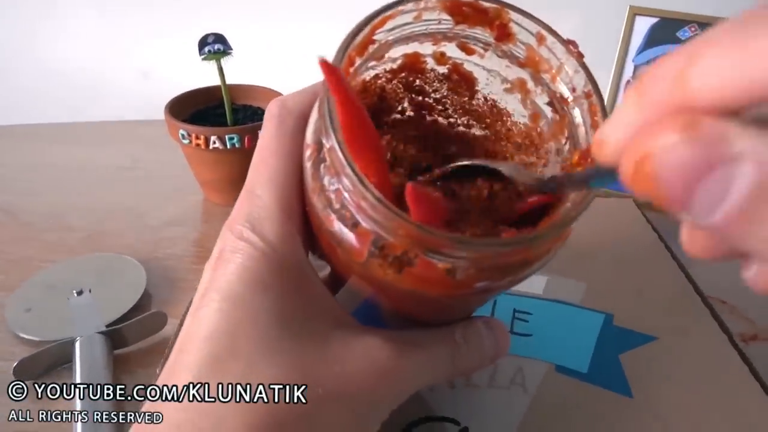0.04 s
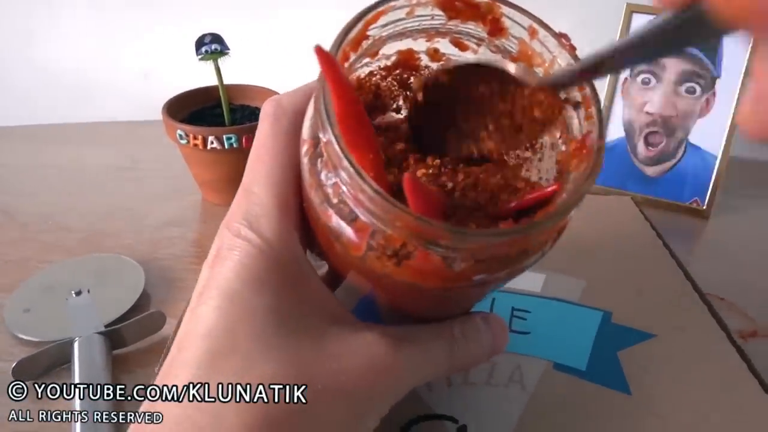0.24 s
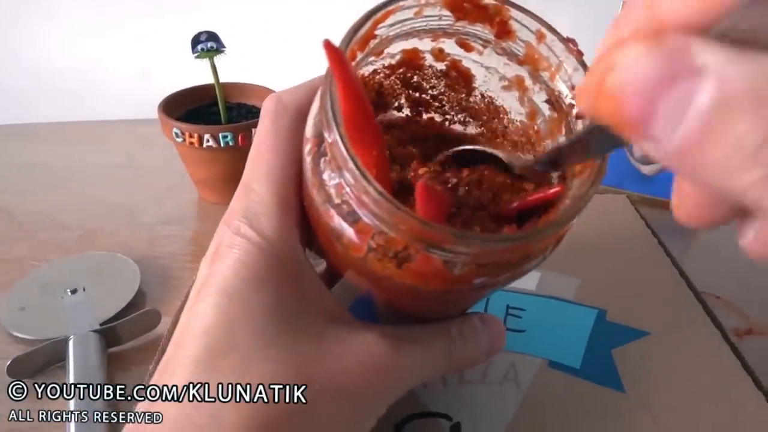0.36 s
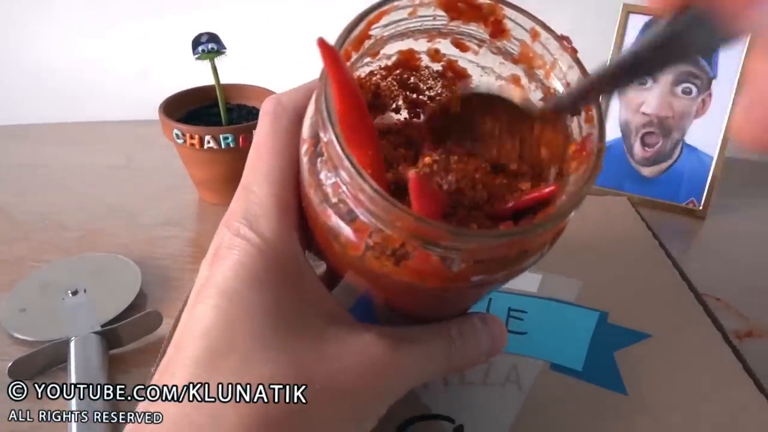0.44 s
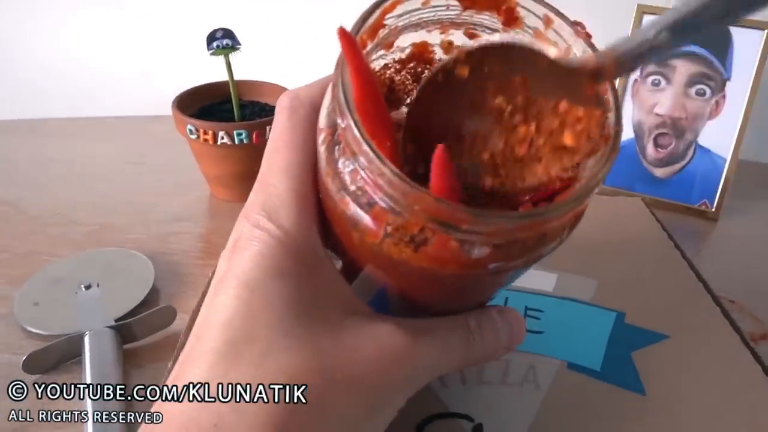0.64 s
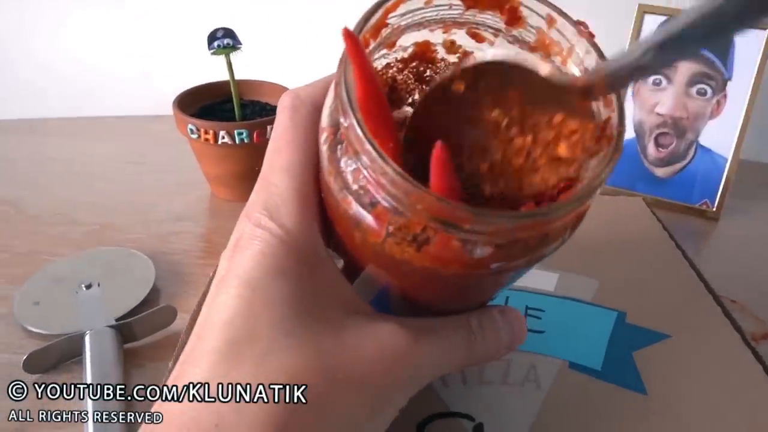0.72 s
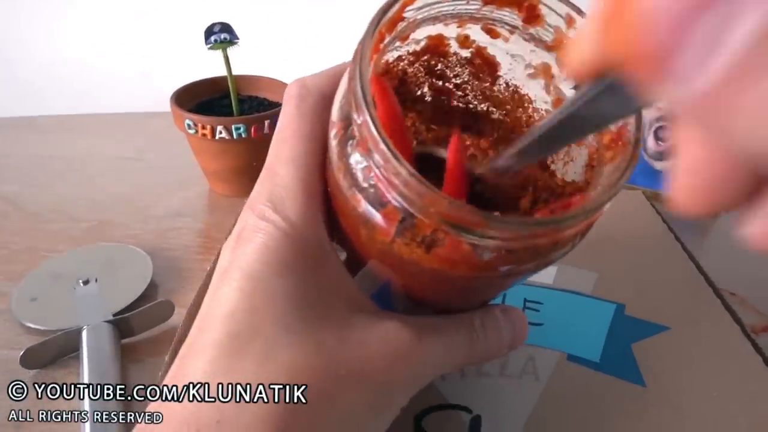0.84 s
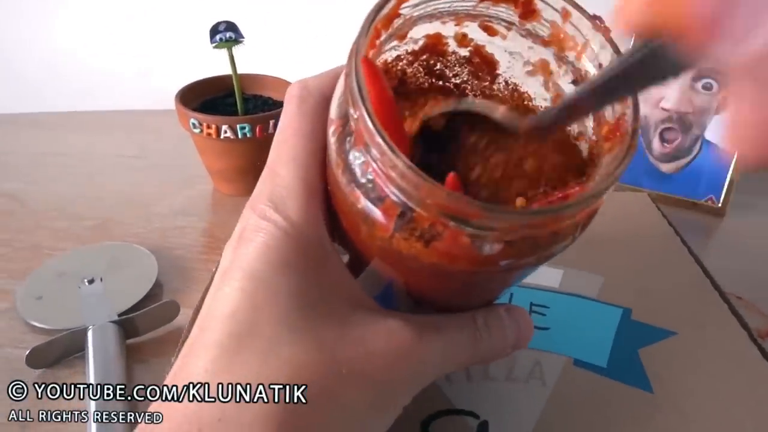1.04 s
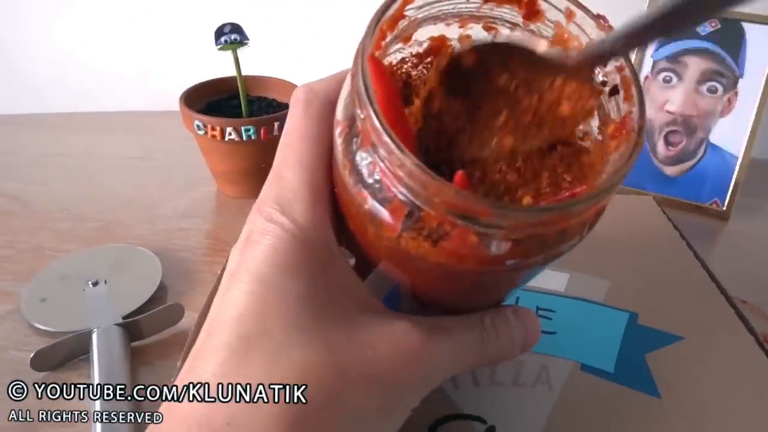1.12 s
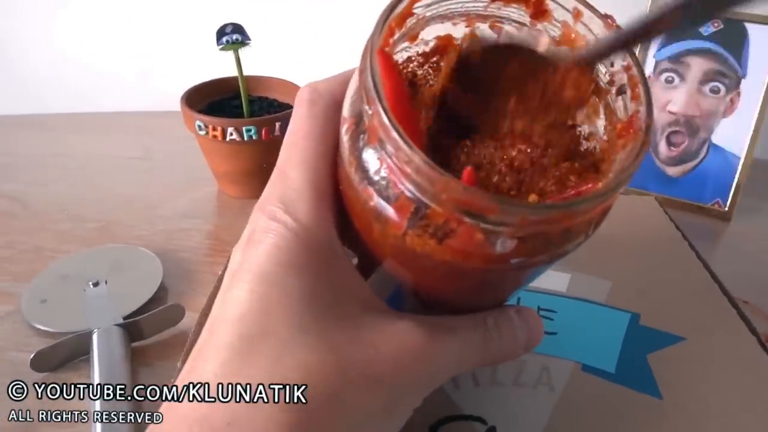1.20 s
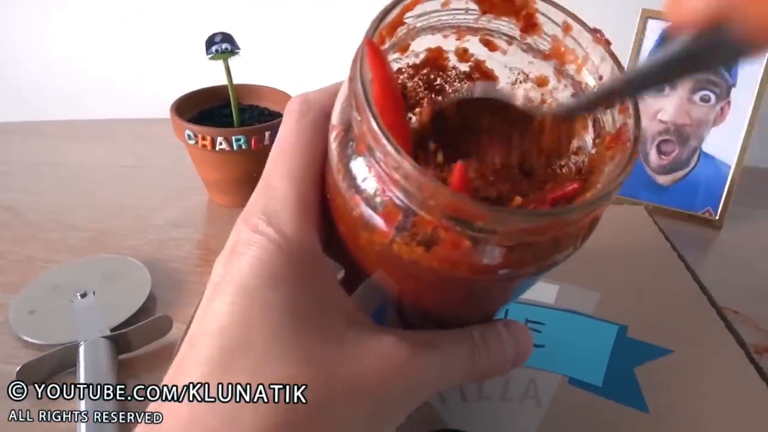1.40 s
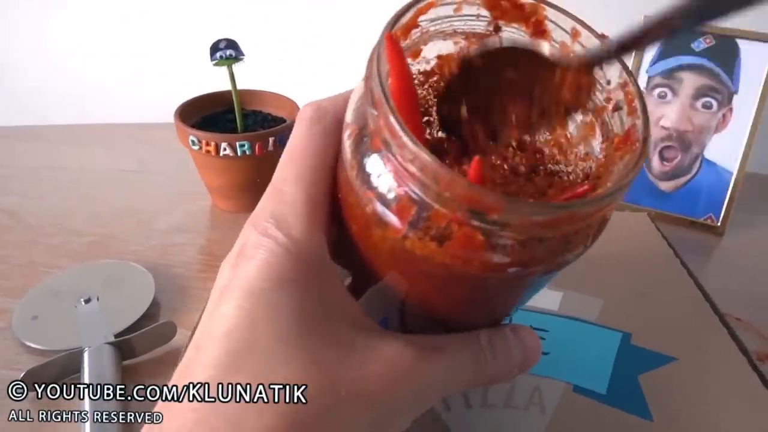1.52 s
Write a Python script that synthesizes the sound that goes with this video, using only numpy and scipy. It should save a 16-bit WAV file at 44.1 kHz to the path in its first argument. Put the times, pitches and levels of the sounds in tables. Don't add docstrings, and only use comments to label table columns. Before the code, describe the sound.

A metal spoon scrapes up the inside of a hand-held glass jar, clinks three times, the last hardest, then rubs down the wall with small sticky ticks, close-miked in a quiet room with a low appliance hum.

```python
import sys
import numpy as np
from scipy import signal
from scipy.fft import rfft, irfft
from scipy.io import wavfile
from scipy.ndimage import uniform_filter1d

SR = 44100
rng = np.random.default_rng(int(sys.argv[2]) if len(sys.argv) > 2 else 0)


def volts_from_decibels(level):
    exponent = np.asarray(level, float) / 20
    return 10 ** exponent


def transcribe(u):
    v = np.clip(np.atleast_2d(u).T, -1, 1)
    q = np.round(v * 32767).astype(np.int16)
    wavfile.write(sys.argv[1], SR, q)


N = 68355

# frequency in Hz, density in dB per Hz.
AIR_SPECTRUM = [(12, -56), (20, -25), (87, -10), (164, -8.5), (215, -11.5), (282, -10), (1410, -22),
                (1570, -20.5), (13600, -32.5)]
# frequency in Hz, likeness from 0 to 1.
AIR_LIKENESS = [(60, 1.0), (240, 0.9), (950, 0.51), (3770, 0.38), (15000, 0.64)]
AIR_DB = -53

# frequencies in Hz, then levels in dB.
HUM_HZ = (85.3, 146.6, 170.8, 256, 292, 341, 439)
HUM_DB = (-48.5, -51, -62.5, -70, -71.5, -67, -67)
HUM_WAVER_DB = 1.02

ROOM_T60_S, ROOM_DB, ROOM_DULL_HZ = 0.2, -13, 6500

# time in seconds, level in dB.
SQUELCH_LEVEL = [(.93, -76), (0.943, -50), (.96, -70), (1.04, -53), (1.07, -78), (1.39, -81), (1.402, -55),
                 (1.49, -53), (1.518, -66)]
SQUELCH_HZ, SQUELCH_WIDTH_HZ, BUBBLES_PER_S = 606, 240, 340

# start in
# seconds, peak in dB, pitch in Hz, left-right in dB.
TICKS = [(.175, -45.5, 5200, -3), (.2255, -33, 9500, -7), (0.3428, -29, 8000, 0),
         (0.5186, -29.5, 10100, -1), (0.9408, -42, 546, 1), (.704, -42, 5400, -4), (0.7581, -39, 1800, -6),
         (0.788, -42, 5100, -6), (.823, -41, 1600, -3), (.824, -43, 3000, -3), (.84, -45, 800, 0),
         (1.4, -53, 630, -2), (1.2735, -37, 12500, -10), (1.2743, -37, 7600, -4), (1.2956, -24.5, 6900, -5),
         (1.339, -45, 7000, -4), (1.351, -48, 8500, -4), (1.4788, -39, 10600, -4), (1.496, -30, 5720, -3),
         (1.529, -44, 9500, -3)]
TICK_CYCLES, TICK_SNAP_DB = 2.8, -7

# start in seconds, length in seconds, level in dB, lowest Hz, left-right in dB.
SLIDES = [
    (0, 0.072, -52, 3000, -4),
    (0.487, 0.15, -54, 8000, -3),
    (0.704, 0.022, -55, 4500, -7),
    (0.74, 0.038, -48, 3500, -7.5),
    (0.767, 0.22, -50.5, 3000, -5),
]
SWELLS = [
    (0.232, 0.02, -44, 3500, -8),
    (0.31, 0.072, -47.5, 5160, -7),
    (1.07, 0.19, -54, 7000, -6.5),
    (1.244, 0.12, -49.5, 2720, -4),
    (1.429, 0.11, -58.5, 4020, -8),
]
SLIDE_RISE, SLIDE_FALL = 0.031, 0.75
SWELL_RISE, SWELL_FALL = 0.26, 0.53
SLIDE_SAG_DB = 0.5

# frequency in Hz, width in Hz, level in dB.
BOWL_BODY = [(4400, 110, -16.5), (5200, 18, -1), (5700, 420, -2), (6170, 50, 7), (7900, 630, -5),
             (10030, 200, 5), (10970, 33, 7.5), (13100, 100, 4)]
BOWL_WASH_DB = 9

# time in seconds, level in dB.
UP_PRESS = [(.232, -77), (0.249, -49.5), (.295, -44), (.315, -38.5), (.327, -44), (0.333, -36),
            (.355, -38.5), (.37, -59)]
RIM_PRESS = [(.352, -63), (0.363, -40), (.40, -42), (.44, -44.5), (0.489, -49.5)]
WALL_PRESS = [(0.493, -37), (.515, -41.5), (.53, -33), (.58, -37.5), (.63, -42), (.70, -48.5),
              (0.74, -52.5), (.76, -76)]
LOW_PRESS = [(.739, -64), (0.747, -41), (.77, -50), (.80, -49.5), (.825, -44), (.85, -51.5), (.89, -53.5),
             (.95, -61.5)]
# frequency in Hz, width in Hz, level in dB.
UP_BODY = [(818, 37, 2), (1100, 56, -3.5), (1582, 84, -0.5), (1800, 74, -2), (2030, 50, 2.5),
           (2330, 74, -7), (2620, 110, -15), (3410, 140, -21), (4000, 130, -16), (5700, 300, -31),
           (6470, 400, -17)]
RIM_BODY = [(440, 125, -5), (790, 67, 1), (1146.5, 21.5, 3.5), (1990, 74, -0.5), (2350, 39, -4.5),
            (3000, 200, -14), (4346, 25, -9.5), (5700, 140, -13), (6280, 200, -12), (6780, 160, -14.5)]
WALL_BODY = [(557, 65, -2.5), (670, 22, 1.5), (775, 60, -6), (1350, 57, -4), (1553, 45, -6),
             (1737, 95, 1.5), (2034, 66, -0.5), (2336, 61, -3), (3020, 59, -23.5), (3846, 280, -8.5),
             (4290, 130, -14), (4780, 100, -18.5), (5610, 110, -14), (6180, 120, -14)]
LOW_BODY = [(805, 63, -2.5), (1600, 120, -1.5), (1817, 87, 1), (2340, 93, -1), (3040, 170, -8),
            (3670, 110, -6), (4190, 45, -8.5), (5240, 81, -13.5), (5670, 140, -14), (6430, 110, -3.5)]
UP_WASH_DB, RIM_WASH_DB, WALL_WASH_DB, LOW_WASH_DB = -6.5, -3.5, -5.5, -0.5
SLIPS_PER_S, SLIP_SPREAD_DB = 3000, 2
SHIFT_DB, CLUMP_DB = 2, 1
GLASS_TOP_HZ, GLASS_LR_DB = 7000, -1.5

# start in seconds, peak in dB, chatter length in seconds, crack in dB,
# left-right in dB.
CLINKS = [
    (0.2452, -20, 0.0011, -11, -5),
    (0.3551, -16, 0.00604, -15, -3),
    (0.4936, -6.5, 0.001504, -19, -1.5),
]
# frequency in Hz, level in dB, T60 in s.
MODES_A = [(670, -4.5, 0.083), (1110, 1.5, 0.038), (1786, 2.5, 0.065), (2060, 4.5, 0.045), (2350, 1, 0.04),
           (2615, 14, 0.0097), (3230, 0.5, 0.035), (4110, -8, 0.02), (5560, -3, 0.016), (6150, 10, 0.01),
           (7960, -7, 0.017), (9200, 0, 0.012), (9830, 0, 0.0091), (10700, 7, .012)]
MODES_B = [(473, -13, 0.058), (814, 4, 0.029), (1128, 0.5, 0.05), (1590, -1.5, 0.025), (1891, -0.5, 0.044),
           (2394, -2.5, 0.023), (2670, 2, 0.027), (3004, -1, 0.026), (4280, -1.5, 0.028), (5600, 1, 0.028),
           (6650, 1, 0.017), (9090, -1, .012), (11270, 7.5, 0.0083), (13850, -8, 0.011)]
MODES_C = [(557, -8, 0.13), (769, -3.5, 0.045), (1386, -14, 0.077), (1550, -17.5, 0.049), (1780, 5, 0.025),
           (2070, -0.5, 0.019), (2314, 1.5, 0.044), (2450, -18, 0.04), (3540, -3, 0.012), (3830, 0, 0.017),
           (4400, -21.5, 0.053), (5600, -21, 0.05), (8000, -28, 0.02), (11300, -13, 0.011)]
# frequency in Hz, density in dB per Hz.
CRACK_A = [(500, -35), (1500, -9), (2800, 7), (4500, -9), (7500, -19), (11000, -8), (13000, -25),
           (15400, -40)]
CRACK_B = [(250, -34), (700, 10), (1400, -7), (2800, 1), (5000, -21), (8000, -17), (11500, -6),
           (15400, -28)]
CRACK_C = [(400, -23), (900, 8), (2000, 5), (3900, -5.5), (5000, -36), (8000, -13), (12000, -19),
           (15400, -45)]
RISE_S, CRACK_T60_S = 0.00064, 0.028

WIDE_DB, NARROW_HZ = -4.5, 670
SHELF_HZ, EDGE_HZ, SHELF_DB, GATE_DB = 13650, 16450, -10, -36


def evened(x):
    return x / np.sqrt(np.mean(x ** 2) + 1e-20)


def drift(size):
    return evened(uniform_filter1d(uniform_filter1d(rng.standard_normal(N), size), size))


def envelope(points):
    s, db = np.transpose(points)
    return volts_from_decibels(np.interp(np.arange(N) / SR, s, db, left=-120, right=-120))


def read(points, hz):
    f, value = np.transpose(points)
    return np.interp(np.log(hz + 1), np.log(f + 1), value)


def colour(x, points):
    n = x.shape[-1]
    gain = volts_from_decibels(read(points, np.fft.rfftfreq(n, 1 / SR)))
    return irfft(rfft(x) * gain, n)


def high(x, hz):
    return signal.sosfilt(signal.butter(2, hz, "high", fs=SR, output="sos"), x)


def resonate(x, hz, width_hz):
    pole = np.exp((2j * np.pi * hz - np.pi * abs(width_hz)) / SR)
    return 2 * signal.lfilter([1 - abs(pole)], [1, -pole], x).real


def pan(x, lr_db):
    return np.array([x * volts_from_decibels(lr_db / 2), x * volts_from_decibels(-lr_db / 2)])


def add(mix, s, sound):
    part = mix[:, round(s * SR):][:, :sound.shape[1]]
    part += sound[:, :part.shape[1]]


def air():
    a, b = rfft(rng.standard_normal((2, N)))
    same = np.clip(read(AIR_LIKENESS, np.fft.rfftfreq(N, 1 / SR)), 0, 1)
    right = same * a + np.sqrt(1 - same ** 2) * b
    pair = irfft(np.array([a, right]), N)
    return volts_from_decibels(AIR_DB) * evened(colour(pair, AIR_SPECTRUM))


def hum():
    t = np.arange(N) / SR
    total = np.zeros(N)
    for hz, db in zip(HUM_HZ, HUM_DB):
        level = np.sqrt(2) * volts_from_decibels(db + HUM_WAVER_DB * drift(1500))
        total += level * np.sin(2 * np.pi * (hz * t + rng.random()))
    return total


def room(x):
    t = np.arange(SR // 3) / SR
    shape = (2, len(t))
    taps = rng.choice([-1., 1.], shape) * (rng.random(shape) < 2000 / SR) * (t > 0.001)
    tail = taps * volts_from_decibels(-60 * t / ROOM_T60_S) * (1 + 2.3 * np.exp(-t / 0.0019))
    tail = signal.lfilter(*signal.butter(1, ROOM_DULL_HZ, fs=SR), tail)
    tail = tail / np.linalg.norm(tail[0])
    return signal.fftconvolve(x.mean(0)[None], tail, axes=1)[:, :N]


def slips(per_s, spread_db):
    size = volts_from_decibels(spread_db * np.minimum(rng.exponential(1, N), 4)) * rng.choice([-1., 1.], N)
    return evened(size * (rng.random(N) < per_s / SR))


def squelch():
    pops = resonate(slips(BUBBLES_PER_S, 1.0), SQUELCH_HZ, SQUELCH_WIDTH_HZ)
    pops = resonate(pops, SQUELCH_HZ, 470)
    return envelope(SQUELCH_LEVEL) * evened(pops)


def tick(s, peak_db, hz, lr_db):
    u = np.arange(1200) / SR * hz / TICK_CYCLES
    snap = rng.standard_normal(1200)
    for _ in range(2):
        snap = resonate(snap, hz, 0.59 * hz)
    wave = np.sin(2 * np.pi * TICK_CYCLES * u) + volts_from_decibels(TICK_SNAP_DB) * evened(snap)
    return s, pan(volts_from_decibels(peak_db) * 9.3 * u * np.exp(-3.0 * u) * wave, lr_db)


def rub(body, wash_db):
    drive = slips(SLIPS_PER_S, SLIP_SPREAD_DB) * volts_from_decibels(CLUMP_DB * drift(250))
    sharp, broad = np.zeros(N), np.zeros(N)
    for k, (hz, width_hz, db) in enumerate(body):
        level = volts_from_decibels(db + SHIFT_DB * drift(800))
        sharp += (-1) ** k * level * resonate(drive, hz, width_hz)
        broad += volts_from_decibels(db) * resonate(drive, hz, 32.0 * width_hz)
    return evened(high(evened(sharp) + volts_from_decibels(wash_db) * evened(broad), 470))


def slide(hiss, s, length_s, db, low_hz, lr_db, rise, fall):
    u = np.arange(round(length_s * SR)) / SR / length_s
    edge = np.minimum(np.minimum(u / rise, (1 - u) / fall), 1)
    shape = np.sin(edge * np.pi / 2) ** 2 * volts_from_decibels(db + SLIDE_SAG_DB * u)
    stretch = hiss[round(s * SR):][:len(u)]
    return s, pan(shape * high(stretch, low_hz), lr_db)


def scrape():
    t = np.arange(N) / SR
    strokes = ((0, UP_PRESS, UP_BODY, UP_WASH_DB),
               (CLINKS[1][0], RIM_PRESS, RIM_BODY, RIM_WASH_DB),
               (CLINKS[2][0], WALL_PRESS, WALL_BODY, WALL_WASH_DB),
               (0, LOW_PRESS, LOW_BODY, LOW_WASH_DB))
    sound = np.zeros(N)
    for start_s, press, body, wash_db in strokes:
        sound += envelope(press) * (t > start_s) * rub(body, wash_db)
    return pan(signal.lfilter(*signal.butter(2, GLASS_TOP_HZ, fs=SR), sound), GLASS_LR_DB)


def clink(s, peak_db, chatter_s, crack_db, lr_db, modes, crack_spectrum):
    t = np.arange(SR // 4) / SR
    noise = rng.standard_normal((2, len(t)))
    rise = np.minimum(t / RISE_S, 1)
    after_s = np.maximum(t - chatter_s, 0)
    touch = rise * volts_from_decibels(-60 * after_s / 0.0013)
    ring = np.zeros(len(t))
    for hz, db, t60_s in modes:
        mode = resonate(touch * noise[0], hz, 2.53 / t60_s)
        ring += volts_from_decibels(db) * mode / abs(mode).max()
    ring = high(high(ring, 290), 290)
    crack = evened(colour(noise[1], crack_spectrum)) * rise * volts_from_decibels(-60 * after_s / CRACK_T60_S)
    return s, pan(volts_from_decibels(peak_db) * (0.27 * ring + volts_from_decibels(crack_db) * crack), lr_db)


def ports(x):
    mid, side = x.mean(0), (x[0] - x[1]) / 2
    side = signal.lfilter(*signal.butter(1, NARROW_HZ, "high", fs=SR), side)
    side = side + volts_from_decibels(WIDE_DB) * np.gradient(mid)
    return np.array([mid + side, mid - side])


def scene():
    near = scrape() + squelch()
    hiss = rub(BOWL_BODY, BOWL_WASH_DB)
    for row in TICKS:
        add(near, *tick(*row))
    for row in SLIDES:
        add(near, *slide(hiss, *row, SLIDE_RISE, SLIDE_FALL))
    for row in SWELLS:
        add(near, *slide(hiss, *row, SWELL_RISE, SWELL_FALL))
    spots = zip(CLINKS, (MODES_A, MODES_B, MODES_C), (CRACK_A, CRACK_B, CRACK_C))
    for row, modes, crack_spectrum in spots:
        add(near, *clink(*row, modes, crack_spectrum))
    return ports(near + volts_from_decibels(ROOM_DB) * room(near)) + hum() + air()


def band_limit(x):
    return signal.sosfilt(signal.butter(12, 16450, fs=SR, output="sos"), x)


def record(dry):
    low = signal.firwin(601, SHELF_HZ, window=("kaiser", 9), fs=SR)
    wide = signal.firwin(601, EDGE_HZ, window=("kaiser", 9), fs=SR)
    body = signal.oaconvolve(dry, low[None], "same")
    top = signal.oaconvolve(dry, (wide - low)[None], "same")
    power = abs(uniform_filter1d((top ** 2).mean(0), 600))
    gate = power ** 2 / (power ** 2 + volts_from_decibels(GATE_DB) ** 4)
    top = signal.lfilter(*signal.butter(6, SHELF_HZ, fs=SR), top)
    return band_limit(body + volts_from_decibels(SHELF_DB) * gate * top)


dry = scene()
out = record(dry)
transcribe(out)
```